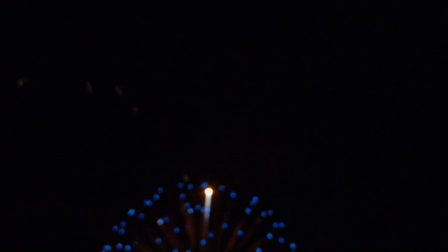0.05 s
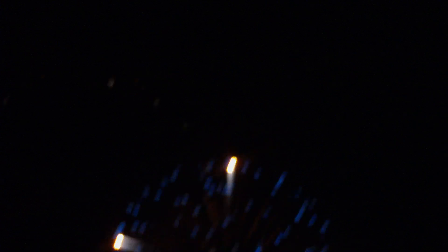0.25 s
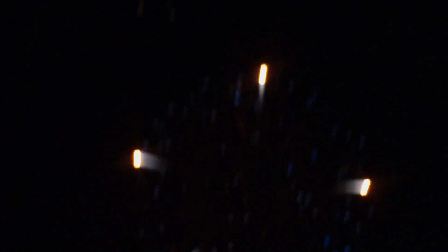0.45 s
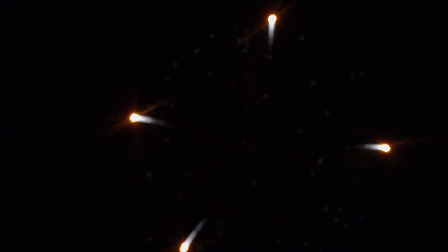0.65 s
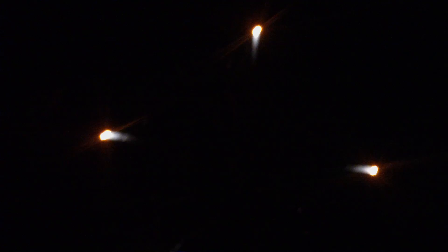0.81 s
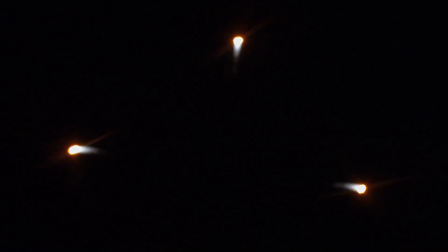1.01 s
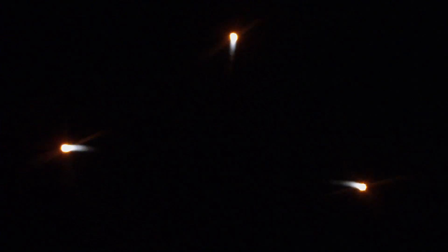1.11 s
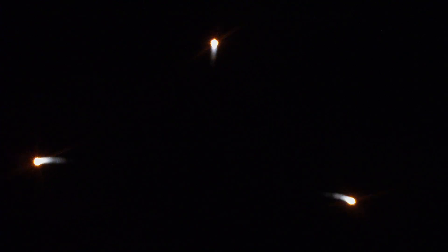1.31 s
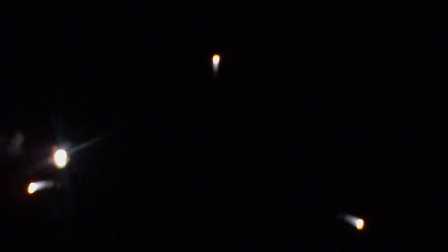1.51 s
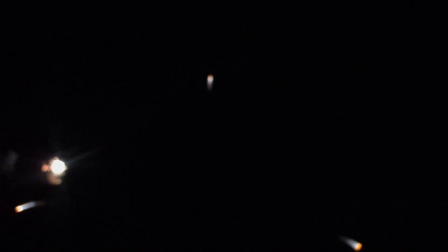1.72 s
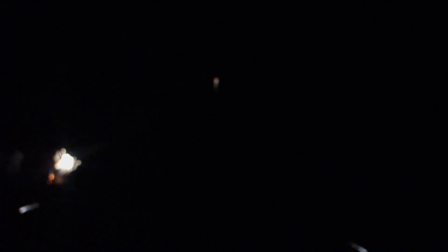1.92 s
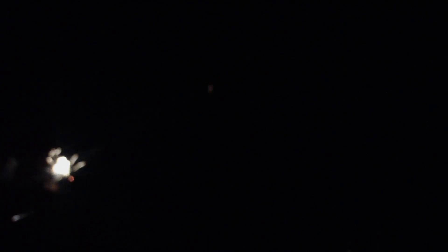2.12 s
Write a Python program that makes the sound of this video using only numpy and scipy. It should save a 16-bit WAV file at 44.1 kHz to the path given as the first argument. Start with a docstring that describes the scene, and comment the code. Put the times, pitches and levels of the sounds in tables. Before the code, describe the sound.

Loud aerial firework bang that clips the microphone, rolling boom, and thin descending whistles overhead at night

```python
"""Outdoors at night, under fireworks. One shell bursts close enough to overload the microphone: damped pressure
pushes with cracks and scattered noise, then sharp echoes and smaller reports. The boom rolls away over the ground
as decaying bands of noise. Whistling stars, four near and two far, are rough tones that fall in pitch as they
burn down. Behind them lie a far, hollow pop, the noise rumble of earlier bursts and the wash of the open air."""
import sys
import numpy as np
from scipy import signal
from scipy.fft import rfft, irfft, next_fast_len
from scipy.io import wavfile
from scipy.ndimage import map_coordinates

SR = 44100
rng = np.random.default_rng(int(sys.argv[2]) if len(sys.argv) > 2 else 0)


def bounce(signal):
    """Save signal as a 16-bit WAV file at the path given by the first command-line argument."""
    frames = np.transpose(np.atleast_2d(signal))
    limited = np.clip(frames, -1, 1)
    pcm = np.round(limited * 32767).astype(np.int16)
    wavfile.write(sys.argv[1], SR, pcm)


N = 94815
T = np.arange(N) / SR  # time [s]

# Shock fronts at the microphone: the burst, its ground bounce and echoes, then smaller reports; columns
# (time [s], push before damping and air loss [dB], length of the push [ms], scatter [dB], crack [dB])
SHOCK_FRONTS = [(0.2145, 19.5, 1.84, -5, -18.5), (0.2177, 12.5, 0.55, -19.5, -18.5),
                (0.2196, 4.5, 0.6, -16, -33), (0.225, 5.5, 1.85, -39.5, -36), (0.26, -10, 0.27, -16, -18.5),
                (0.2613, 4, 0.96, -24.5, -46), (0.268, -1.5, 2.5, -27, -49), (.319, -8.5, 4.4, -33, -37),
                (0.344, -2.5, 1.45, -21, -20), (0.358, -6, 1.4, -30, -22), (0.4213, -8, 4.4, -26, -31),
                (0.439, -12, 3.1, -21.5, -41), (0.482, -7, 5.5, -35.5, -44), (0.526, -13, 4.5, -29.5, -56),
                (.836, -17.5, 3.2, -52, -72), (1.069, -56.5, 0.32, -60, -36.5),
                (1.204, -24.5, 3.3, -26, -53)]


def amp(db):
    """Decibels to gain."""
    return 10 ** (np.asarray(db) / 20)


def unit(x):
    """Scale to rms 1."""
    return x / np.sqrt(np.mean(x ** 2) + 1e-20)


def wobble(rate):
    """A smooth random curve with `rate` knots a second."""
    knots = rng.standard_normal(int(N * rate / SR) + 4)
    return map_coordinates(knots, [T * rate])


def filtered(x, response):
    """Multiply the spectrum of x by a response of frequency [Hz]."""
    padded = next_fast_len(N + SR // 2)
    hz = np.fft.rfftfreq(padded, 1 / SR)
    return irfft(rfft(x, padded) * response(hz), padded)[:N]


def noise(spectrum):
    """Noise of rms 1, coloured by (frequency [Hz], relative level [dB]) points."""
    points_hz, points_db = np.transpose(spectrum)

    def colour(hz):
        return amp(np.interp(np.log(hz + 1), np.log(points_hz), points_db))

    return unit(filtered(rng.standard_normal(N), colour))


def fade(age, t60):
    """Exponential decay from age zero, falling 60 dB in t60 seconds."""
    return (age >= 0) * np.exp(-np.log(1000) * np.maximum(age, 0) / t60)


def background():
    """Far rumble of earlier bursts and the steady wash of the open air, both coloured noise."""
    # Rumble of earlier bursts: (time [s], level [dB])
    rumble_level = [(0, -29.5), (.04, -36), (.17, -40.5), (.4, -30.5), (1.25, -38), (1.5, -46.5),
                    (2.15, -44.5)]
    # Colour of that rumble: (frequency [Hz], relative level [dB])
    rumble_colour = [(25, -17), (70, 7.5), (120, -0.5), (600, -71)]
    # Colour of the night air: (frequency [Hz], relative level [dB])
    air_colour = [(20, -11), (150, 2), (400, -6.5), (1100, -3.5), (1700, -12.5), (3000, -19), (4900, -15.5),
                  (6500, -14.5), (7600, -40.5)]
    air_db = -43

    rumble = amp(np.interp(T, *np.transpose(rumble_level))) * noise(rumble_colour)
    return rumble + amp(air_db) * noise(air_colour)


def roll():
    """Countless echoes of the burst: noise with a quick decay and a long one per band, grainy above the bass."""
    # The boom over the ground, by band:
    # (centre [Hz], early level [dB], early t60 [s], late level [dB], late t60 [s])
    bands = [(50, -34, 4.8, -48, 8.2), (127, -15, 1.24, -24.5, 3.67), (349.5, -27, 1.4, -40, 5.4),
             (920, -26, 1.46, -29.5, 4.16), (1910, -32.5, 2.44, -42, 5.1), (5230, -36, 0.33, -80, 0.83)]
    rise_s, lump_db, grain_db = 0.023, 1.5, 1.8

    age = T - SHOCK_FRONTS[0][0]
    log_centres = np.log([row[0] for row in bands])
    lumps = amp(lump_db * wobble(44.76))  # shared by all bands
    echoes = np.zeros(N)
    for share, (_, early_db, early_t60, late_db, late_t60) in zip(np.eye(len(bands)), bands):

        def band(hz):
            return np.interp(np.log(hz + 1), log_centres, share) * hz / (hz + 20)

        early = amp(early_db) * fade(age, early_t60)
        late = amp(late_db) * fade(age, late_t60)
        echoes += np.hypot(early, late) * unit(filtered(rng.standard_normal(N), band)) * lumps

    bass = filtered(echoes, lambda hz: 1 / (1 + (hz / 400) ** 4))
    grain = unit(amp(grain_db * wobble(450)))
    rise = 1 - np.exp(-np.maximum(age, 0) / rise_s)
    return (bass + (echoes - bass) * grain) * rise


def pop():
    """A far, hollow report: a few rough cycles at one pitch, dying away quickly."""
    start_s, pitch_hz, level_db, t60_s = 0.6045, 880, -17, 0.06
    age = T - start_s
    rough_phase = 2 * np.pi * pitch_hz * age + wobble(500)
    return amp(level_db) * fade(age, t60_s) * np.sin(rough_phase)


def whistle(rows, flutter, swing=0):
    """A burning tube's tone, hoarse while high, in a narrow rush of gas that swells once; tumbling swings its pitch."""
    tumble_hz, rise_s = 10, 0.05
    flutter_at_hz, flutter_grows = 4000, 5.4  # pitch where flutter is as given, and its power law with pitch
    rasp_db, sputter_s, sputter_length_s, sputter_peak_db = -22, 1.67, 0.045, 18

    s, hz, db = np.transpose(rows)
    glide = np.interp(T, s, hz)
    turn = np.cos(2 * np.pi * tumble_hz * T + 0.5 * wobble(4))
    hoarse = flutter * (glide / flutter_at_hz) ** flutter_grows
    pitch = glide * (1 + swing * turn + hoarse * wobble(500) + 0.0018 * wobble(22))

    ignition = np.clip((T - s[0]) / rise_s + 1, 0, 1)  # full by the first row
    level = amp(np.interp(T, s, db) + 2.3 * wobble(24))

    sputter_db = sputter_peak_db * np.exp(-((T - sputter_s) / sputter_length_s) ** 2)
    gas = (wobble(450) + 1j * wobble(450)) / np.sqrt(2)
    rasp = amp(rasp_db + sputter_db) * gas  # narrow noise carried at the tone's own pitch
    tone = np.real((1 + rasp) * np.exp(2j * np.pi * np.cumsum(pitch) / SR))
    return ignition * level * np.sqrt(2) * tone


def stars():
    """The whistles flying past; their echoes trail at the higher pitch of a moment before."""
    # Four near stars, then two faint, far ones: (time [s], pitch [Hz], level before the direct or echo gain [dB])
    high_star = [(0, 6450, -73), (0.17, 6180, -46.5), (0.43, 5810, -40.5), (0.58, 5660, -43.5),
                 (0.73, 5420, -50.5), (0.9, 5200, -41), (1.18, 4790, -40.5), (1.35, 4450, -40.5),
                 (1.6, 4140, -44), (1.8, 3910, -37), (2, 3780, -42.5), (2.15, 3710, -42)]
    second_star = [(0, 5280, -53.5), (0.33, 5170, -39.5), (0.5, 4950, -45), (0.61, 4960, -43),
                   (0.8, 4850, -47.5), (1.08, 4604, -45.5), (1.35, 4340, -54), (1.62, 4236, -57),
                   (1.68, 4240, -43), (1.84, 3987, -59.5)]
    tumbling_star = [(0.28, 4982, -49), (0.48, 4729, -40), (0.66, 4530, -45.5), (0.78, 4440, -42),
                     (0.97, 4257, -37), (1.1, 4190, -46.5), (1.33, 3995, -45), (1.42, 3760, -40),
                     (1.75, 3674, -45), (2.15, 3534, -44)]
    low_star = [(0.4, 4603, -39), (0.505, 4500, -37.5), (0.53, 4230, -47), (0.55, 4103, -42.5),
                (0.72, 4032, -43), (1, 3885, -44), (1.2, 3816, -43.5), (1.42, 3563, -45),
                (1.58, 3514, -42.5), (1.65, 3343, -52), (1.8, 3388, -46.5), (2.15, 3198, -45.5)]
    far_star = [(1.051, 6330, -54.5), (1.301, 5840, -59), (1.601, 5650, -55.5), (2.15, 5206, -68)]
    farthest_star = [(1.351, 6600, -74), (1.722, 6060, -58), (2.098, 5580, -63)]
    # The high star's throb, ever slower: (time [s], rate [beats/s], depth [0-1])
    throb_rows = [(1.0, 110, .4), (1.75, 68, .65), (2.15, 46, .75)]
    direct_db, echo_db, echo_t60_s = -0.8, -7.5, 0.7

    s, beats, depth = np.transpose(throb_rows)
    throb_phase = 2 * np.pi * np.cumsum(np.interp(T, s, beats)) / SR + 0.5 * wobble(4)
    throb = 1 + np.interp(T, s, depth) * np.sin(throb_phase)

    direct = throb * whistle(high_star, flutter=0.0018)
    direct += whistle(second_star, flutter=0.0042) + whistle(low_star, flutter=0.0022)
    for rows in (tumbling_star, far_star, farthest_star):
        direct += whistle(rows, flutter=0.0011, swing=0.011)

    tail = rng.standard_normal(N) * fade(T, echo_t60_s)
    echoes = signal.fftconvolve(direct, tail / np.linalg.norm(tail))[:N]
    return amp(direct_db) * direct + amp(echo_db) * echoes


def reports():
    """Each front is a sudden push and a longer suction, with a bright crack and a short spray of scattered sound."""
    # Colour of the scattered spray: (frequency [Hz], relative level [dB])
    scatter_colour = [(60, 6), (330, -2), (470, 12), (620, -6), (1000, -8), (1380, 2.5), (1600, -10),
                      (2050, -18.5), (7000, -62)]
    # Colour of the crack: (frequency [Hz], relative level [dB])
    crack_colour = [(300, -4), (2000, 9.5), (4200, 4.5), (6700, 4.5), (7800, -36)]
    rise, damping = 0.15, 0.76  # rise time in push lengths, decay rate per push length
    scatter_t60_s, crack_t60_s = 0.057, 0.03
    front_top_hz = 1580  # the air takes the edge off every front

    fronts, spray, crack = np.zeros((3, N))
    for s, push_db, ms, scatter_db, crack_db in SHOCK_FRONTS:
        u = np.maximum(T - s, 0) * 1000 / ms  # age in push lengths
        swing = np.cos(np.pi * u / 2) * np.exp(-damping * u)
        fronts -= amp(push_db) * (1 - np.exp(-u / rise)) * swing  # a push drives the waveform negative
        spray += amp(scatter_db) * fade(T - s, scatter_t60_s)
        crack += amp(crack_db) * fade(T - s, crack_t60_s)

    softened = filtered(fronts, lambda hz: 1 / (1 + 1j * hz / front_top_hz))
    return softened + spray * noise(scatter_colour) + crack * noise(crack_colour)


def scene():
    """Everything, near and far, at one microphone."""
    return (background() + roll() + pop() + stars() + reports())[None]


def record(dry):
    """The input clips on the burst; then the treble is cut, and its overshoot meets full scale again."""
    clip_top, treble_top_hz, top_hz = 1.0, 7600, 15800
    clipped = np.clip(dry[0], -clip_top, clip_top)
    heard = filtered(clipped, lambda hz: 1 / (1 + (hz / treble_top_hz) ** 60))
    clipped_again = np.clip(heard, -clip_top, clip_top)
    return filtered(clipped_again, lambda hz: hz < top_hz)[None]


dry = scene()
out = record(dry)
bounce(out)
```